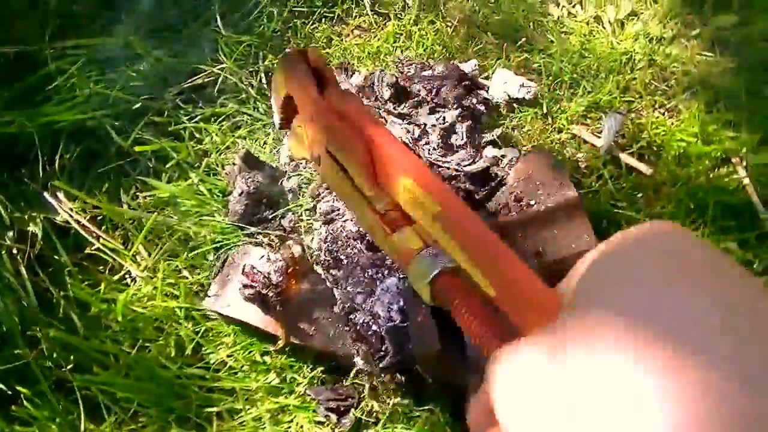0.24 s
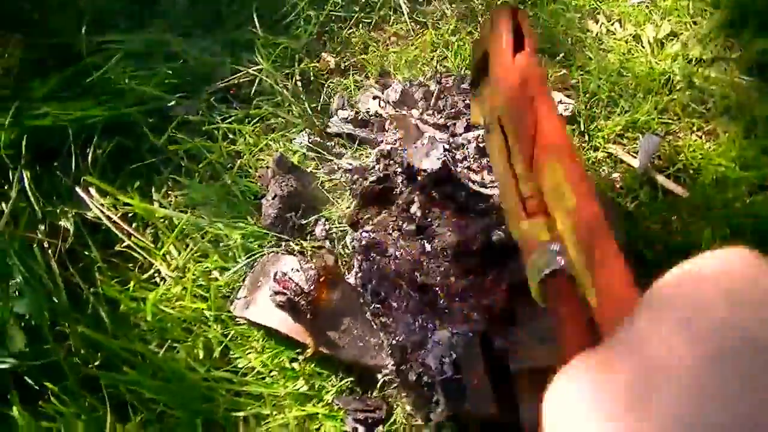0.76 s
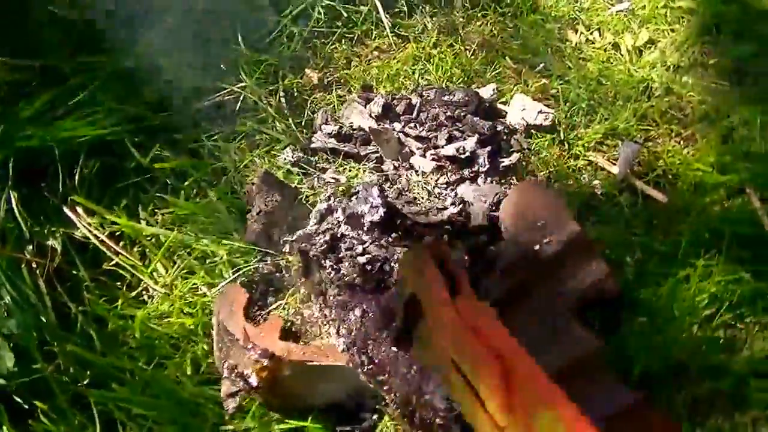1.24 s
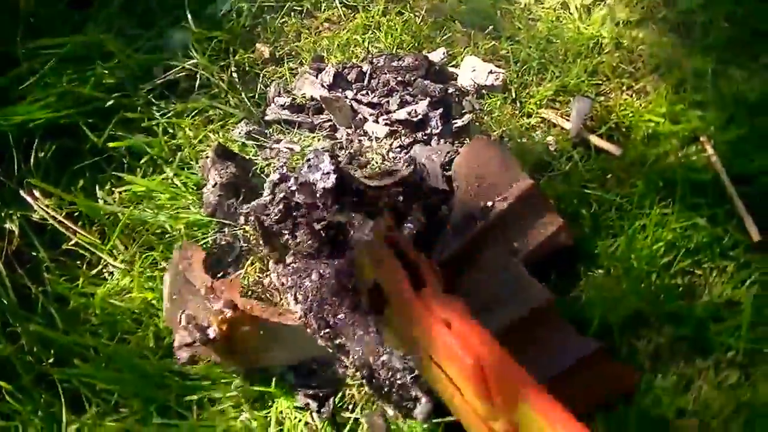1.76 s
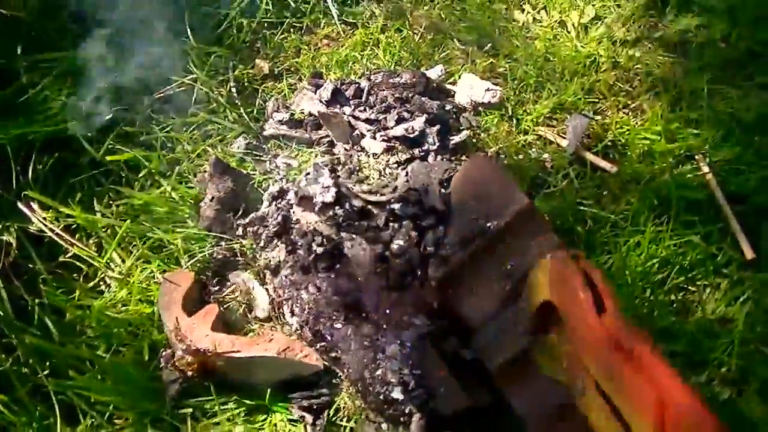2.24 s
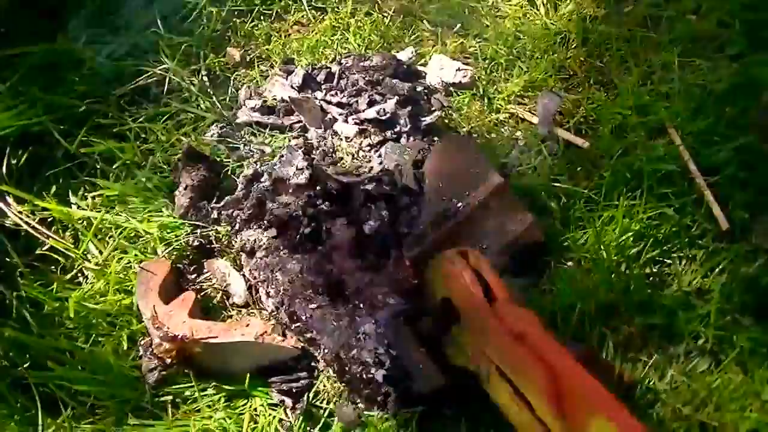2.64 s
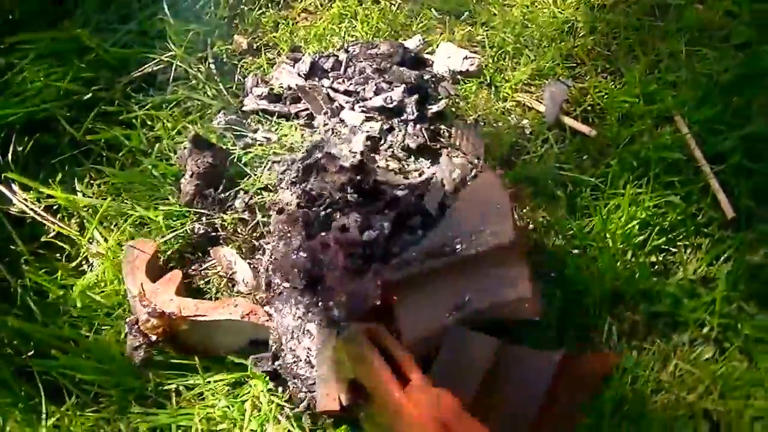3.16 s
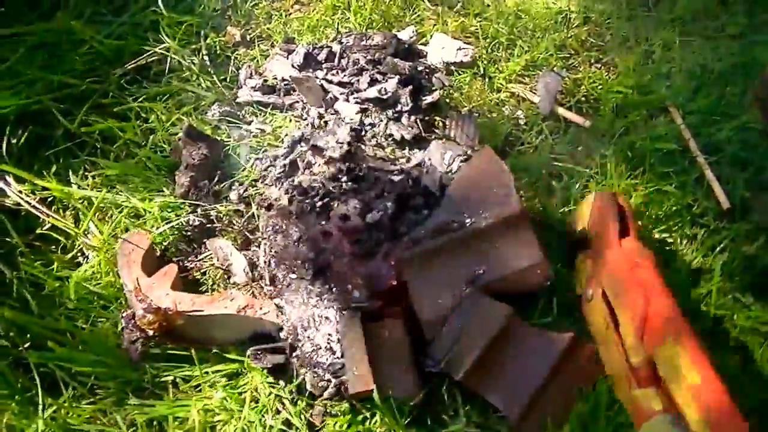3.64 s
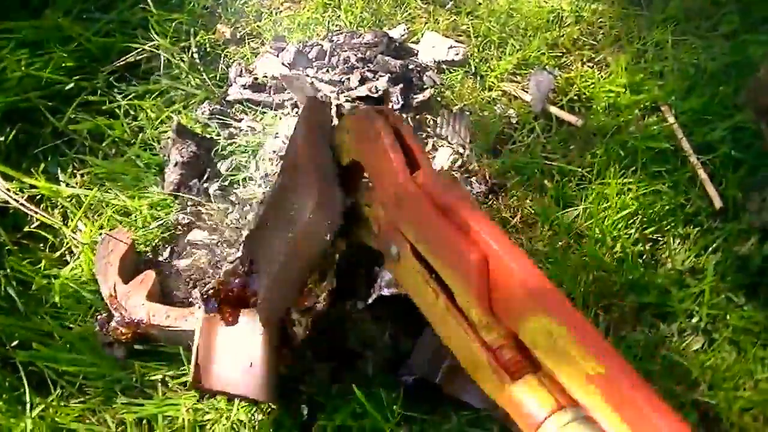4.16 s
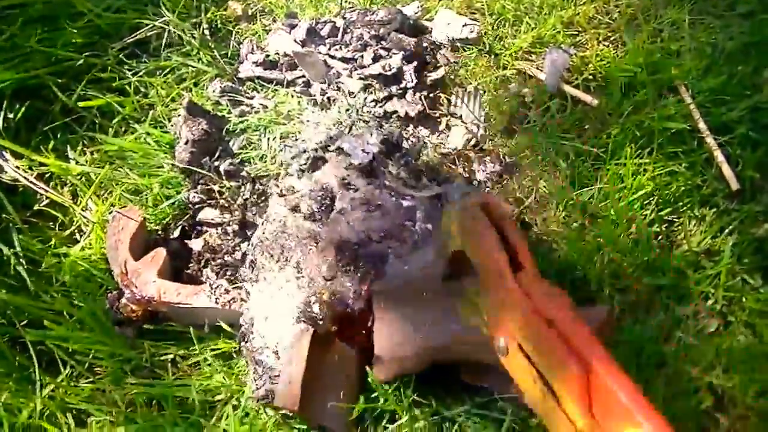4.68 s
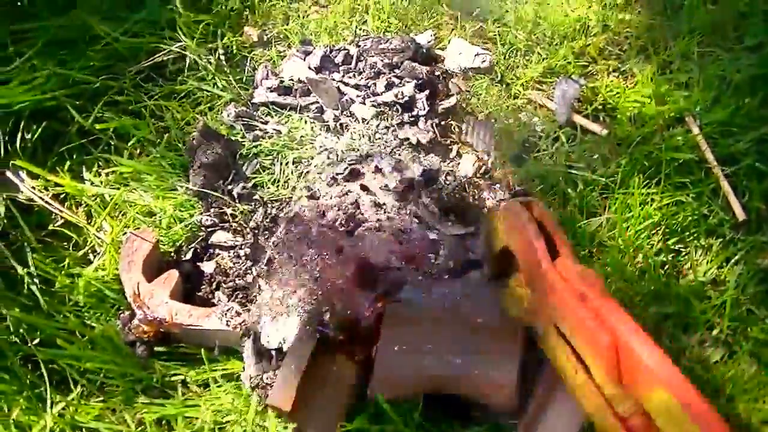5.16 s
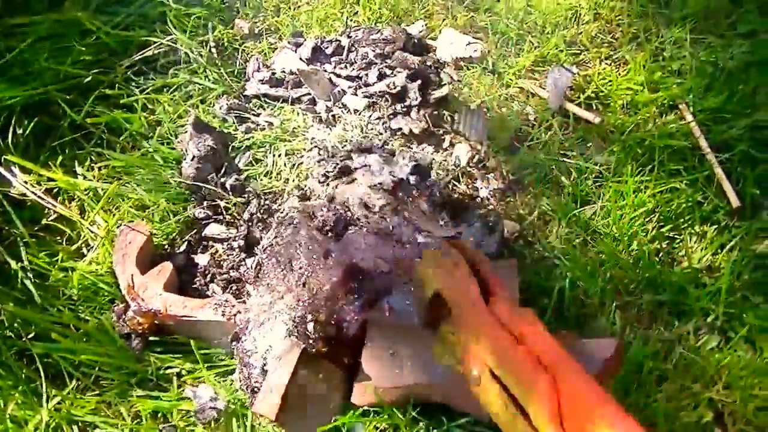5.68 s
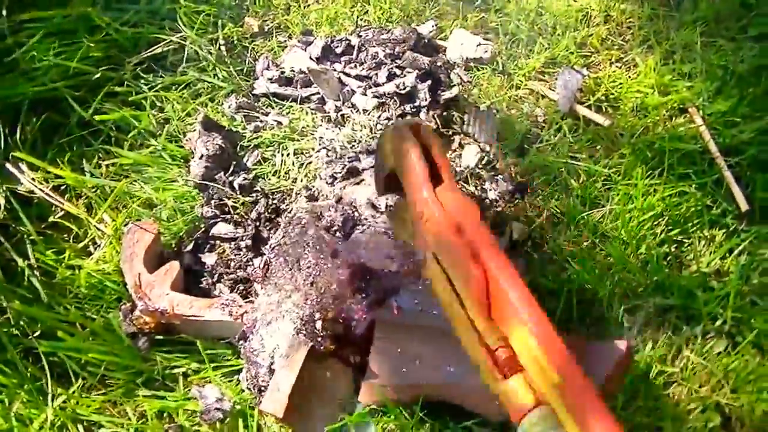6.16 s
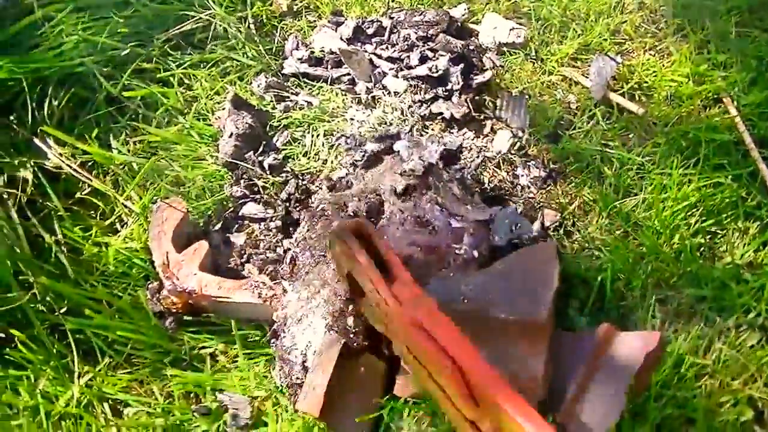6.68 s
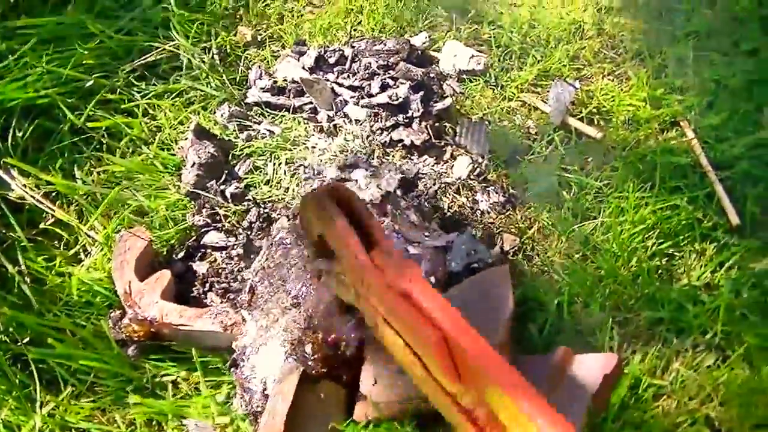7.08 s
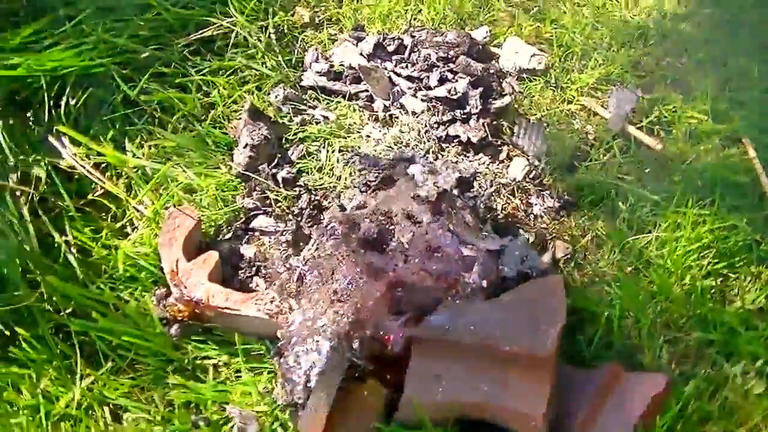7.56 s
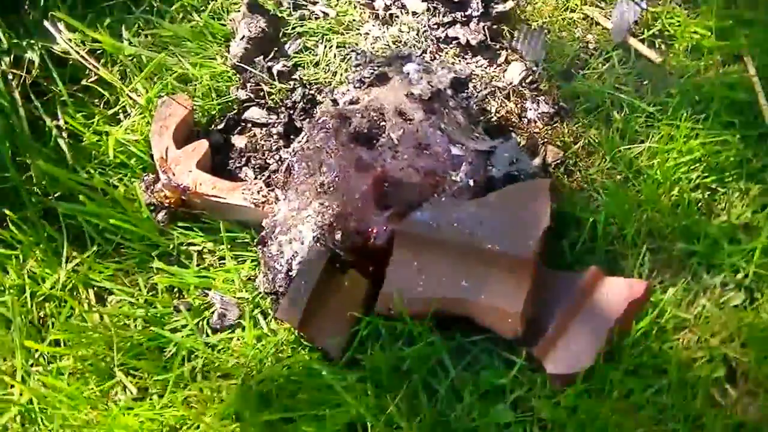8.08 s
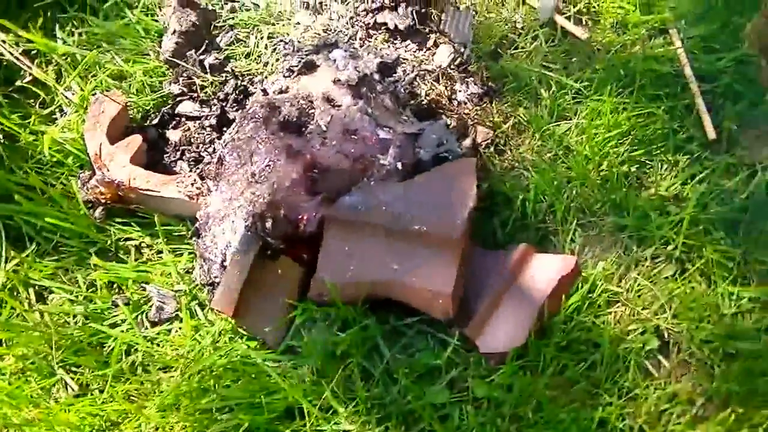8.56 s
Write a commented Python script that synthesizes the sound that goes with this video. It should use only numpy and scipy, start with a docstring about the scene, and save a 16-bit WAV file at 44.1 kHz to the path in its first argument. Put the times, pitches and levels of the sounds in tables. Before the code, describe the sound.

After a brief crackle of ash and a small puff of wind, steel pliers poke a pile of charcoal, ash and broken tile on grass. Sharp metallic clinks with gritty crunches come at uneven gaps, mixed with scrapes, light ticks and trickling debris. The ringing is short and damped. Close microphone outdoors, soft hiss, low wind bumps; the hardest hits distort, and the end is nearly quiet.

```python
"""A brief crackle of ash over outdoor hiss and a wavering far hum, then a wind puff on the microphone.
Steel pliers poke and rake charcoal, ash and broken tile on a lawn: shaped noise scrapes and crackles.
Each blow is a noise crunch plus decaying modes of steel and tile, stopped by the closing touch.
Light touches tick, each with one main pitch, dry grit snaps, debris trickles after blows;
the hardest blows clip."""
import sys
import numpy as np
from scipy.fft import rfft, irfft, next_fast_len
from scipy.io import wavfile
from scipy.ndimage import map_coordinates

SR = 44100
rng = np.random.default_rng(int(sys.argv[2]) if len(sys.argv) > 2 else 0)


def digitize_waveform(pressure):
    """Quantize a signal to 16-bit integers and store it at the path in sys.argv[1].

    Rows of a 2-D input are taken as channels; values are limited to [-1, 1].
    """
    field = np.atleast_2d(pressure).T
    bounded = np.clip(field, -1, 1)
    quanta = np.round(bounded * 32767).astype(np.int16)
    wavfile.write(sys.argv[1], SR, quanta)


N = 389388

# hum level: t/s, level/dB
HUM_LEVEL = [(0, -54.5), (2.1, -49), (3.7, -56.5), (4.3, -80)]
# wind puffs: t/s, level/dB
PUFFS = [(0.114, -36), (1.25, -36), (2.882, -36.5), (3.113, -34), (3.679, -35), (3.87, -28), (5.017, -38.5),
         (5.389, -27), (5.484, -32.5), (5.815, -22.5), (5.871, -32.5), (7.869, -42), (8.16, -27.5),
         (8.481, -28), (8.525, -29), (8.606, -28)]
# noise spectra (outdoor hiss, wind rumble, grass, scraped clay, ash crackle): f/Hz, level per Hz/dB
AIR_SPECTRUM = [(150, -26.5), (280, -6), (950, -12), (7000, -21), (13000, -28.5), (14500, -67.5)]
WIND_SPECTRUM = [(20, -16.5), (62, 2.5), (150, -0.5), (400, -22), (700, -88)]
GRASS_SPECTRUM = [(3000, -25), (6000, 0), (13000, -3), (14800, -40)]
CLAY_SPECTRUM = [(120, -21), (350, 0.5), (700, 0), (2500, -21), (5000, -40)]
ASH_SPECTRUM = [(300, -8), (2100, -4.5), (9500, -4.5), (13500, -22.5), (16000, -53)]
# strokes through the ash: start/s, end/s, relative scrape/dB, relative crackle/dB
STROKES = [(0, 0.043, -73, -42), (0.167, 0.35, -54, -46), (0.962, 1.01, -50.5, -38),
           (1.303, 1.362, -60, -31.5), (1.376, 1.461, -48, -37), (2.779, 2.827, -45, -37),
           (3.097, 3.418, -58, -46.5), (3.179, 3.292, -58, -29.5), (4.057, 4.18, -78, -36.5),
           (4.363, 4.509, -39.5, -34), (4.521, 4.534, -33.5, -22), (5.047, 5.07, -50, -35.5),
           (5.146, 5.362, -50.5, -52), (6.218, 6.324, -40.5, -66.5), (6.566, 6.69, -53.5, -58)]
# dry grit breaking: t/s, relative level/dB
SNAPS = [(0.2756, -7.5), (0.2929, -22), (0.3034, -27), (0.3083, -22.5), (0.3626, -30), (0.838, -27),
         (0.9747, -17), (2.31, -27), (3.1877, -21), (3.2174, -28), (3.2256, -9.5), (3.2499, -10.5),
         (3.275, -15), (4.2958, -28), (4.3121, -26), (4.369, -25), (5.0925, -22.5), (6.2215, -28.5),
         (6.9122, -33), (7.1756, -33), (7.5795, -34), (7.6096, -30.5), (7.663, -33), (7.7621, -31),
         (8.097, -27.5)]
# light ticks of the pliers: t/s, relative level/dB, main pitch/Hz, t60/s
LIGHT_TOUCHES = [(0.2366, -8, 7360, 0.07), (0.3135, -5.5, 2070, 0.0057), (0.438, -32.5, 2720, 0.12),
                 (0.437, -16.5, 7510, 0.041), (0.912, -14, 7300, 0.04), (0.9957, -23.5, 8850, 0.03),
                 (1.3909, -20, 7300, 0.048), (1.423, -30, 7300, 0.063), (1.445, -17.5, 1100, 0.011),
                 (2.0753, -28, 4760, 0.027), (2.087, -18, 4850, 0.038), (2.993, -28, 6430, 0.021),
                 (3.0192, -14.5, 4570, 0.017), (3.413, -4.5, 2080, 0.013), (3.49, -31.5, 6260, 0.051),
                 (3.749, -23.5, 5500, 0.024), (4.0657, -20, 5770, 0.027), (4.341, -29.5, 7450, 0.032),
                 (4.595, -10, 3060, 0.011), (4.604, -25, 6200, 0.037), (4.639, -20, 6330, 0.015),
                 (4.7208, -23, 3310, 0.015), (4.7398, -22, 2090, 0.051), (4.7485, -21.5, 3350, 0.048),
                 (5.073, -18.5, 5240, 0.022), (5.2257, -19, 7280, 0.081), (5.277, -31.5, 4520, 0.16),
                 (5.303, -21, 4590, 0.081), (5.517, -23.5, 5550, 0.021), (6.42, -13, 1290, 0.016),
                 (6.4858, -11, 1830, 0.0074), (6.6857, -9.5, 1990, 0.0045), (6.759, -25, 2020, 0.031),
                 (6.825, -15, 5500, 0.036), (6.958, -25.5, 4900, 0.1), (6.9767, -21, 4930, 0.039),
                 (6.994, -28, 2150, 0.041), (7.11, -9.5, 4840, 0.013), (7.236, -28, 4860, 0.04),
                 (7.311, -20.5, 2690, 0.012), (7.8782, -28.5, 7300, 0.056)]
# low modes, partly the struck tile; modes of the pliers' jaw and tip:
# f/Hz, level within the part/dB, free t60/s
TILE = [(1890, -1, .07), (2094, -1, .06), (2372, -6, .045), (3285, -1, .11), (4370, -9, .09)]
JAW = [(4570, -10, .07), (4740, -10, .06), (4861, 0, .15), (5536, -2, .12), (6234, -10, .1),
       (6693, -12, .09)]
TIP = [(7200, -9, .08), (7479, 0, .13), (8650, -12, .07), (9250, -12, .06), (10251, -7, .1),
       (10607, -11, .08), (11097, -5, .11), (12800, -11, .08), (13700, -12, .08)]
# centres of thud, tile, jaw and tip bands: f/Hz
PART_HZ = [700, 2500, 5000, 8500]
# blows: t/s, contact/s, strength/dB, brightness/dB, favoured mode/Hz, crunch against ring/dB
BLOWS = [(0.2354, 0.075, -20, 0, 3220, -3.5), (0.26, 0.017, -22.5, 0, 3340, -27),
         (0.571, 0.029, -10, 2, 3350, 4), (0.587, 0.0055, -12, -2, 3320, -6),
         (0.9195, 0.013, -4.5, 0, 4460, 10), (1.2665, 0.013, -5.5, 3.5, 3280, 12.5),
         (1.548, 0.026, -38.5, 6, 6900, 10), (1.8587, 0.011, -6.5, -3, 12000, 5),
         (2.1165, 0.02, 2.5, 3.5, 4726, 7.5), (2.6794, 0.0093, 1, -0.5, 4720, 3),
         (2.7034, 0.018, -26.5, -1.5, 5070, 9), (2.8052, 0.007, -24.5, 0.5, 7260, 0.5),
         (3.0792, 0.0093, -22.5, -5, 4660, 4.5), (3.0876, 0.013, -20, -0.5, 3280, 8),
         (3.418, 0.0085, -12, 0.5, 4700, -2), (3.434, 0.0063, -11.5, -1.5, 4070, -13),
         (3.456, 0.0061, -16.5, 2, 4660, 4.5), (3.791, 0.022, 4.5, -2, 10950, -7.5),
         (3.832, 0.27, -34, 10, 4900, -8), (3.907, 0.027, -20, -0.5, 4460, -3.5),
         (3.916, 0.07, -21, 4, 7660, -19), (4.1146, 0.0099, -37, -16, 3285, 8),
         (4.451, 0.061, -36, 9, 4900, 6), (4.474, 0.031, -25, 4, 2080, -4.5),
         (4.584, 0.016, -36, -9.5, 4800, 10.5), (4.804, 0.028, 1, 1, 4730, 2.5),
         (5.057, 0.0051, -29.5, -3, 4820, -28.5), (5.1348, 0.022, 3.5, 2.5, 4874, 4),
         (5.155, 0.031, -25, -1, 3200, -9.5), (5.598, 0.021, 4.5, 2.5, 4905, 1.5),
         (5.709, 0.031, -32.5, -11, 4860, 8.5), (5.72, 0.021, -21.5, 2.5, 8100, -9),
         (5.7373, 0.018, -26.5, 2.5, 7500, 5.5), (5.7779, 0.01, -10.5, 0.5, 4600, 2.5),
         (5.789, 0.019, -21, 3, 4820, 0.5), (6.315, 0.0093, 1.5, 1.5, 7450, 10),
         (6.327, 0.024, -15.5, -7.5, 7860, -9), (6.357, 0.022, -9, 1, 4800, 4),
         (6.379, 0.021, -19.5, -1.5, 7600, -2), (6.396, 0.018, -22.5, 7, 4830, 3),
         (6.7931, 0.013, 4.5, -2, 7700, 3), (7.046, 0.014, 4, -2, 7550, 2.5),
         (7.275, 0.0062, -24.5, -2, 4850, -17), (7.3303, 0.025, -4.5, 5.5, 3280, 11),
         (7.345, 0.015, 1.5, 2.5, 4890, -8.5), (7.359, 0.024, -7.5, 3, 5440, -16.5),
         (7.428, 0.0099, -21, -4.5, 4370, 6), (7.532, 0.012, -47, -14.5, 4370, 7.5),
         (8.428, 0.0042, -34, 1, 5940, 18)]

# outdoors
AIR_DB, BREEZE_DB, HUM_HZ = -52.5, -52, 214
PUFF_S, WAKE_DB = 0.06, -16.5  # rise, and fall, of a puff; its rumble against the table level
BUMP_HZ, BUMP_S = 102, 0.0043  # membrane thump: mean pitch, Gaussian half-width
# raking
RUB_DB = 11  # the scraped tile sings in its resonances, 1.9 to 7.2 kHz
SETTLE_DB, SETTLE_T60_S = -19, 0.21  # debris against the blow
SETTLE_CAP_DB = 1  # blow strength past which debris grows no more
PRESSED = 0.7  # share of the free t60 while rubbed or ticked
# snaps and ticks
SNAP_DB, SNAP_T60_S, SNAP_RINGS = -5.5, 0.0091, 1.1  # last: gain of the resonant answer
RING_DB, CLICK_DB, TOUCH_S = -3, 7, 0.0023  # parts of a tick; time constant of its rise
CLICK_REACH_DB, CLICK_T60_S = -2.5, 0.027  # per octave from the main pitch; longest click
# blows: a bright one wakes the tip and spares the tile and the thud
TILE_DB, TIP_DB, THUD_DB = -2, -2.5, -17.5  # against the jaw, at brightness 0
TILE_REACH_DB, TIP_REACH_DB = -5.5, -3.5  # per octave from the favoured mode
JAW_REACH_DB = -10  # per octave above the favoured mode
GRIP_T60_S, DRAIN_DB = 0.04, -9  # stop after contact; loss during contact at crunch 0 dB
LEFT_DB, ESCAPE_DB, TILE_FREE_DB = -27.5, 7.5, 6  # ring left; more if favoured; more yet in the tile
BURIED = 0.16  # dB of remaining ring lost per dB of crunch, favoured mode
DETUNE, FLICKER_DB = 0.005, 3.5  # relative pitch shift at crunch 0 dB; unevenness of the ring left
CRUNCH_DB, CRUNCH_FALLS_DB = 4.5, -30.5  # at contact start, change until its end
CRACK_DB, CRACK_S = 2, 0.00015  # first touch over the crunch, at brightness 0
SWELL_DB, SWELL_S = -37.5, 0.0058  # faint noise swelling just before a blow
LOW_CUT_HZ = 150  # keeps the blows free of bass
# input
INPUT_CUT_HZ, SOFT_HZ, TOP_HZ = 75, 14000, 16100  # bass cut, treble softening, band limit


def amp(db):
    """dB to gain."""
    return 10 ** (np.asarray(db) / 20)


def unit(x):
    """Scale x to rms 1."""
    return x / np.sqrt(np.mean(x ** 2) + 1e-20)


def along(points, hz):
    """Interpolate (Hz, value) points on a log axis."""
    f, v = np.transpose(points)
    return np.interp(np.log(hz + 1), np.log(f + 1), v)


def curve(rows):
    """One value per sample from (s, value) rows."""
    return np.interp(np.arange(N) / SR, *np.transpose(rows))


def wobble(rate_hz):
    """Smooth random curve, rate_hz knots a second."""
    knots = rng.standard_normal(int(N * rate_hz / SR) + 4)
    return map_coordinates(knots, [np.arange(N) * rate_hz / SR])


def swell(start_s, end_s):
    """Rounded rise and fall between two times."""
    progress = np.clip((np.arange(N) / SR - start_s) / (end_s - start_s), 0, 1)
    return np.sqrt(np.sin(np.pi * progress).clip(0))


def filtered(x, response):
    """Apply a response of frequency to x."""
    m = next_fast_len(len(x) + 4096)
    return irfft(rfft(x, m) * response(np.fft.rfftfreq(m, 1 / SR)), m)[:len(x)]


def hiss(points):
    """Noise of rms 1 with the given spectrum."""
    return unit(filtered(rng.standard_normal(N), lambda f: amp(along(points, f))))


def add(out, s, x):
    """Mix x into out at time s."""
    out[round(s * SR):][:len(x)] += x


def resonances(f, modes=TILE + JAW + TIP):
    """Summed band-pass resonances of tile and pliers, damped by contact."""
    response = 0
    for hz, db, t60 in modes:
        width_hz = np.log(1000) / np.pi / (t60 * PRESSED)
        response = response + amp(db) * 1j * f * width_hz / (hz * hz - f * f + 1j * f * width_hz)
    return response


def air():
    """Steady outdoor hiss: shaped noise with a slight level waver."""
    return amp(AIR_DB + 0.37 * wobble(17.0)) * hiss(AIR_SPECTRUM)


def far_hum():
    """Drone: one sine wavering in pitch and level."""
    phase = 2 * np.pi * np.cumsum(HUM_HZ + 5 * wobble(8)) / SR
    return amp(curve(HUM_LEVEL) + 4 * wobble(12)) * np.sin(phase)


def wind_rumble():
    """Low noise on the microphone: a constant breeze that swells at each puff."""
    gusts = amp(BREEZE_DB)
    for s, db in PUFFS:
        gusts = gusts + amp(db + WAKE_DB) * swell(s - PUFF_S, s + PUFF_S) ** 2
    return gusts * unit(amp(3 * wobble(20)) * hiss(WIND_SPECTRUM))


def membrane_thumps():
    """Each puff swings the membrane a cycle or two: a sine in a Gaussian envelope."""
    out, t = np.zeros(N), np.arange(N) / SR
    for s, db in PUFFS:
        hz = BUMP_HZ * rng.uniform(.85, 1.15)
        envelope = amp(db) * np.exp(-((t - s) / BUMP_S) ** 2 / 2)
        out += envelope * np.sin(2 * np.pi * (hz * (t - s) + rng.random()))
    return out


def grass_rustle():
    """One thin, uneven rustle of treble noise as the hand withdraws."""
    return amp(-57 + 4 * wobble(70)) * swell(7.6, 8.03) * hiss(GRASS_SPECTRUM)


def outdoors():
    """Background hiss, wind, hum and one rustle."""
    return air() + wind_rumble() + membrane_thumps() + far_hum() + grass_rustle()


def ash_grains():
    """Few large grains over many fine ones, in clumps; rms 1."""
    size = np.minimum(amp(6 * rng.exponential(1, N)), 3)
    large = size * (rng.random(N) < 700 / SR) * rng.choice([-1, 1], N)
    return unit((large + .3 * rng.standard_normal(N)) * amp(3.5 * wobble(150)))


def ash_crackle(grains):
    """Grains swell with each stroke through the ash and excite steel and tile."""
    level = sum(amp(db) * swell(a, b) for a, b, _, db in STROKES)
    return filtered(grains * level, lambda f: amp(along(ASH_SPECTRUM, f)) * (1 + 6 * resonances(f)))


def settling_debris(grains):
    """Grains trickle after each contact, dying away exponentially."""
    level, t = np.zeros(N + SR), np.arange(SR // 2) / SR
    for s, contact_s, db, *_ in BLOWS:
        fall_db = -60 * t / SETTLE_T60_S
        add(level, s + contact_s, amp(min(db, SETTLE_CAP_DB) + SETTLE_DB + fall_db))

    def response(f):
        return amp(along(ASH_SPECTRUM, f)) * (1 + 1.6 * resonances(f))
    return filtered(grains * level[:N], response)


def clay_scrape(grains):
    """Rough noise under each stroke; the scraped tile sings in its resonances."""
    level = sum(amp(db) * swell(a, b) for a, b, db, _ in STROKES)
    rough = (rng.standard_normal(N) + grains) * amp(3.5 * wobble(120))

    def response(f):
        return amp(along(CLAY_SPECTRUM, f) + 8.5) + amp(RUB_DB) * resonances(f, TILE + TIP[:1])
    return filtered(rough * level, response)


def rake():
    """Crackle, debris and scrape share one stream of grains."""
    grains = ash_grains()
    return ash_crackle(grains) + settling_debris(grains) + clay_scrape(grains)


def snaps():
    """Dry grit breaks: short broad clicks of random tilt that wake steel and tile."""
    out, t = np.zeros(N + SR), np.arange(SR // 20) / SR
    for s, db in SNAPS:
        tilt_db = rng.normal(0, 1)  # per octave

        def response(f):
            return amp(along(ASH_SPECTRUM, f) + tilt_db * np.log2((f + 1) / PART_HZ[2]))
        click = unit(filtered(rng.standard_normal(len(t)), response))
        add(out, s, amp(db + SNAP_DB - 60 * t / SNAP_T60_S) * click)
    return filtered(out[:N], lambda f: 1 + SNAP_RINGS * resonances(f))


def light_touches():
    """Light ticks of the pliers: a click and one phase-jittered main pitch, plus the resonances."""
    out, t = np.zeros(N + SR), np.arange(SR // 8) / SR
    for s, db, hz, t60 in LIGHT_TOUCHES:
        def response(f):
            return amp(along(ASH_SPECTRUM, f) + CLICK_REACH_DB * abs(np.log2((f + 1) / hz)))
        click = filtered(rng.standard_normal(len(t)), response)
        click *= amp(-60 * t / min(t60, CLICK_T60_S))
        jitter = np.cumsum(rng.normal(0, .04, len(t)))
        ring = np.sin(2 * np.pi * hz * t + jitter) * amp(-60 * t / t60)
        rise = 1 - np.exp(-t / TOUCH_S)
        add(out, s, amp(db) * (amp(RING_DB) * ring + amp(CLICK_DB) * click) * rise)
    return filtered(out[:N], lambda f: 1 + 0.5 * resonances(f))


def blow_ring(t, parts_db, favoured_hz, crunch_db, stopped, fading):
    """Decaying modes, strongest near the spot's favoured one, damped by grip and blurred by grit."""
    ring, roughness = np.zeros(len(t)), amp(crunch_db / 2)
    knots_s = np.linspace(0, t[-1], num=24)
    for part_db, part in zip(parts_db, (TILE, JAW, TIP)):
        for hz, db, free_t60 in part:
            octaves = np.log2(hz / favoured_hz)
            near = np.exp(-(octaves / .07) ** 2)  # 1 at the favoured mode
            level_db = part_db + (db + rng.normal(0, 3)) * (1 - near) + 6 * near
            if part is JAW:
                level_db += JAW_REACH_DB * max(octaves, 0)
            else:
                level_db += (TILE_REACH_DB if part is TILE else TIP_REACH_DB) * abs(octaves)
            # gritty contact blurs the pitch
            chatter = np.cumsum(rng.normal(0, .03, len(t)) * (stopped * roughness + .3))
            escape_db = (ESCAPE_DB + TILE_FREE_DB * (part is TILE)) * near
            # grit buries the other modes most
            left_db = LEFT_DB + escape_db - BURIED * crunch_db * (2 - near)
            flicker_db = FLICKER_DB * np.interp(t, knots_s, rng.standard_normal(size=24))
            left = amp(left_db + flicker_db)
            shifted_hz = hz * rng.normal(1, DETUNE * roughness)
            phase = 2 * np.pi * (shifted_hz * t + rng.random()) + chatter
            ring += amp(level_db - 60 * t / free_t60) * np.sin(phase) * (stopped * fading + left)
    return ring


def crushed_grit(t, bands_db):
    """Spiky noise coloured by the blow's thud, tile, jaw and tip levels."""
    # level per Hz falls as the bands widen
    levels = np.array(bands_db) - 10 * np.log10(np.array(PART_HZ) / 5000)
    colour = [(40, levels[0] - 25), *zip(PART_HZ, levels), (16000, levels[-1] - 34.0)]
    spiky = rng.standard_normal(len(t)) * rng.lognormal(0, 0.85, len(t))
    return filtered(spiky, lambda f: amp(along(colour, f)))


def blows():
    """Each blow crushes grit and rings steel and tile until a touch at contact end damps both."""
    out, t = np.zeros(N + SR), np.arange(SR // 5) / SR
    before_t = t[:SR // 50][::-1]  # time left before the blow
    for s, contact_s, jaw_db, bright_db, favoured_hz, crunch_db in BLOWS:
        thud_db = jaw_db + THUD_DB - bright_db
        tile_db = jaw_db + TILE_DB - bright_db
        tip_db = jaw_db + TIP_DB + bright_db
        stopped = amp(-60 * np.maximum(t - contact_s, 0) / GRIP_T60_S)
        # pressure on the jaws drains the ring
        fading = amp(DRAIN_DB * amp(crunch_db / 2) * np.minimum(t / contact_s, 1) ** 2)
        ring = blow_ring(t, (tile_db, jaw_db, tip_db), favoured_hz, crunch_db, stopped, fading)
        grit = crushed_grit(t, [thud_db, tile_db, jaw_db, tip_db])
        crunch = amp(crunch_db + CRUNCH_DB + CRUNCH_FALLS_DB * t / contact_s) * grit * stopped
        crunch *= 1 + amp(CRACK_DB - bright_db) * np.exp(-t / CRACK_S)
        rising = amp(jaw_db + SWELL_DB) * np.exp(-before_t / SWELL_S)
        add(out, s - before_t[0], rising * unit(grit[-len(before_t):]))
        add(out, s, (ring + crunch) * (1 - np.exp(-t / 0.00005)))
    return filtered(out[:N], lambda f: (1j * f / (LOW_CUT_HZ + 1j * f)) ** 2)


def scene():
    """All sources at one microphone, fed to both channels."""
    return np.tile(outdoors() + rake() + snaps() + light_touches() + blows(), (2, 1))


def record(dry):
    """Input clips just under full scale, thins the deep bass, softens and band-limits the treble."""
    clipped = dry / (1 + np.abs(dry / .9) ** 10) ** (1 / 10)

    def response(f):
        bass_cut = 1j * f / (INPUT_CUT_HZ + 1j * f)
        return bass_cut / np.sqrt(1 + (f / SOFT_HZ) ** 6) / (1 + (f / TOP_HZ) ** 200)
    return np.array([filtered(channel, response) for channel in clipped])


dry = scene()
out = record(dry)
digitize_waveform(out)
```